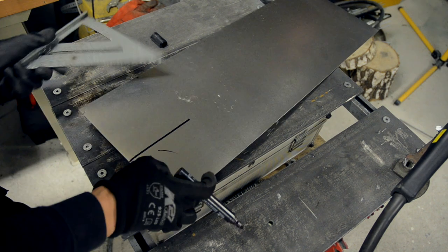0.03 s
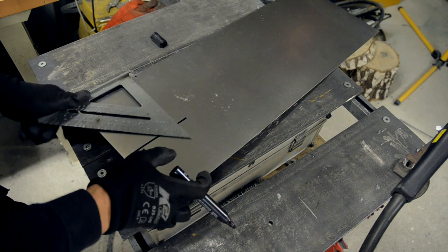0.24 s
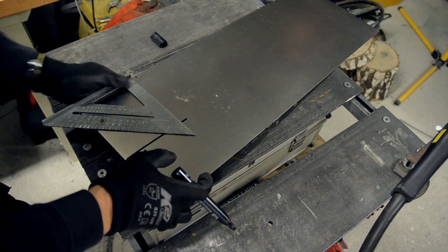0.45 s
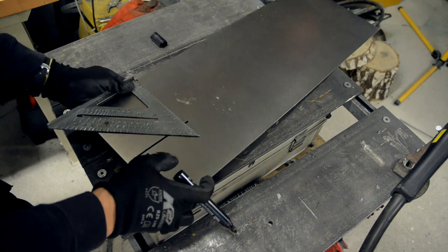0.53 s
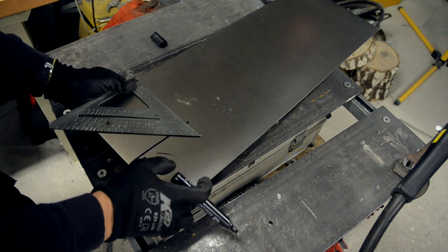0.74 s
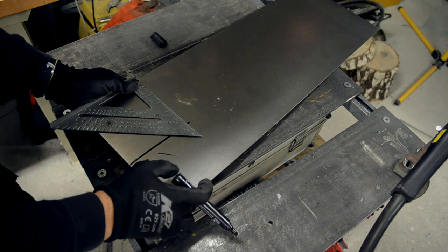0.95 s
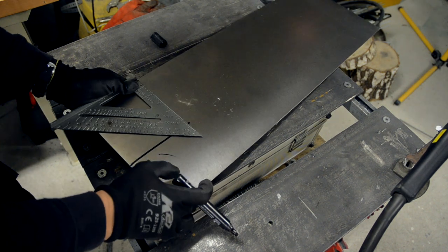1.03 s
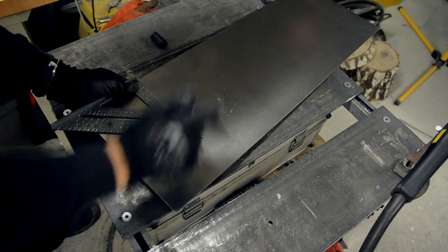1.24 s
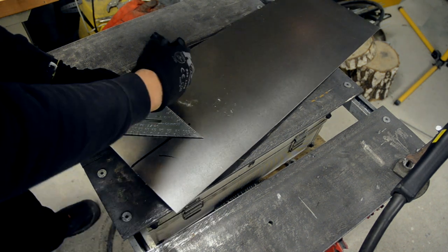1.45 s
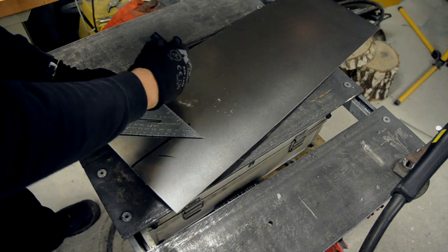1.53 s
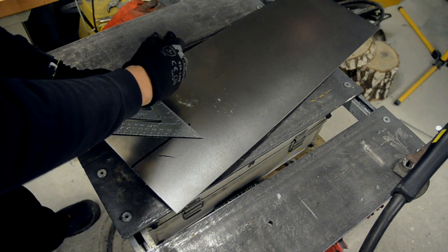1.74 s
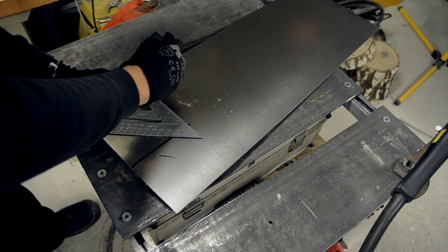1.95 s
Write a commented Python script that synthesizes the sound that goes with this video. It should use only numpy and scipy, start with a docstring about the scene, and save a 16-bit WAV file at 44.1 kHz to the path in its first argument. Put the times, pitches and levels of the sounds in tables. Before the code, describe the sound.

Two close metallic clanks sound in a quiet, humming workshop as a square hits a steel sheet edge first, then drops flat. The ringing dies away quickly, leaving small taps and soft sliding scuffs.

```python
"""Two ringing clanks: a metal square is set down on a steel sheet in a workshop.
Its edge lands with a crack and chatters while the sheet rings; it then drops flat with a slap
and rings until a glove damps it. Faint taps and scuffs surround the clanks and go on as it is
lined up, over the low hum of the room."""
import sys
import numpy as np
from scipy import signal
from scipy.fft import irfft
from scipy.io import wavfile
from scipy.ndimage import uniform_filter1d

SR = 44100
rng = np.random.default_rng(int(sys.argv[2]) if len(sys.argv) > 2 else 0)


def log_audio(samples):
    """Write samples as a 16-bit WAV file to the path given in sys.argv[1]."""
    # one column per channel
    frames = np.atleast_2d(samples).T
    # limit to full scale, then quantise
    limited = np.clip(frames, -1, 1)
    pcm = np.round(limited * 32767).astype(np.int16)
    wavfile.write(sys.argv[1], SR, pcm)


N = 88200
T = np.arange(N) / SR
HZ = np.fft.rfftfreq(N, 1 / SR)
EDGE_S, PRESS_S, FLAT_S, DAMP_S = .2171, .33, .5305, .665

# room decay: freq_hz, t60_s
ROOM_DECAY = [(150, .5), (800, 0.41), (2500, 0.31), (6000, .28), (14000, 0.094)]
# sheet modes under the square's weight: pitch_hz, level_db, t60_s
LOADED_SHEET_MODES = [(366, -7, .6), (381, -5, .45), (829, 0, .62), (1066, -7, .4), (1330, -9, .42)]


def amp(db):
    return 10 ** (np.asarray(db) / 20)


def unit_rms(x):
    return x / np.sqrt(np.mean(x ** 2) + 1e-20)


def curve(points, hz=HZ):
    """Table interpolated over log frequency."""
    freq_hz, value = np.transpose(points)
    return np.interp(np.log(hz + 1), np.log(freq_hz + 1), value)


def add(mix, start_s, sound):
    part = mix[max(round(start_s * SR), 0):]
    part += sound[:len(part)]


def rise(tau_s):
    return 1 - np.exp(-T / max(tau_s, 1e-5))


def fall(t, t60_s):
    return np.exp(-np.log(1000) * t / np.maximum(t60_s, 1e-3))


def noise(spectrum_db):
    """Random-phase noise, rms 1."""
    return unit_rms(irfft(amp(spectrum_db) * np.exp(2j * np.pi * rng.random(len(HZ))), N))


def click(spectrum_db, energy_s):
    """Minimum-phase pulse with the energy of energy_s of unit noise."""
    log_gain = np.log(amp(np.maximum(spectrum_db - spectrum_db.max(), -90)))
    mirrored = np.r_[log_gain, log_gain[-2:0:-1]]
    pulse = np.fft.ifft(np.exp(np.conj(signal.hilbert(mirrored)))).real
    return pulse / np.linalg.norm(pulse) * np.sqrt(energy_s * SR)


def ring(modes, hold_s=0):
    """Partials that hold, then decay."""
    t = np.maximum(T - hold_s, 0)
    return sum(amp(db) * fall(t, t60_s) * np.sin(2 * np.pi * (hz * T + rng.random()))
               for hz, db, t60_s in modes)


def tail(spectrum_db, decays, holds=None):
    """Dense modes and echoes: each band holds, then decays at its own rate."""
    hz, t, bands = signal.stft(noise(spectrum_db), SR, nperseg=256)
    hold_s = curve(holds, hz)[:, None] if holds else 0
    envelope = fall(np.maximum(t - hold_s, 0), curve(decays, hz)[:, None])
    return signal.istft(bands * envelope, SR, nperseg=256)[1][:N]


def grain(depth_db, samples):
    """Quick level swings from uneven contact."""
    swing = unit_rms(uniform_filter1d(rng.standard_normal(N), samples))
    return unit_rms(amp(depth_db * swing))


def contact_spectrum_db(centre_hz, width_oct, skirt_db=7.5):
    """Rounded peak within the range where light contacts move the sheet."""
    bass_hz, treble_hz = 220, 11000
    rolloff = 1 + (bass_hz / (HZ + 1)) ** 4 + (HZ / treble_hz) ** 4
    offset = np.log2((HZ + 1) / centre_hz) * 2 / width_oct
    return -skirt_db * np.hypot(1, offset) - 10 * np.log10(rolloff)


def workshop():
    """Steady room noise with a wavering hum."""
    # noise spectrum: freq_hz, density_db
    floor_spectrum = [(20, -28.5), (35, -17.5), (50, -11), (65, -16.5), (100, -13), (145, -5.5),
                      (190, -7.5), (300, -8), (480, -10), (720, -10), (1000, -14.5), (1500, -20.5),
                      (2500, -28.5), (4000, -33.5), (8000, -44), (12000, -44), (16000, -44.5)]
    # hum tones: pitch_hz, level_db, waver_ratio
    hum_tones = [(47.4, -72.5, 0.12), (146, -64.5, 0.51)]
    room = amp(-59) * noise(curve(floor_spectrum))
    for hz, db, waver in hum_tones:
        drift = noise(-20 * np.log10(1 + (HZ / 3) ** 4))  # below 3 Hz
        tone = np.sin(2 * np.pi * (hz * T + rng.random()))
        room += amp(db) * unit_rms((1 + waver * drift) * tone)
    return room


def scuff(peak_s, half_length_s, level_db, centre_hz, width_oct):
    """Square or glove slides on the steel: a grainy swell and fade."""
    friction = noise(contact_spectrum_db(centre_hz, width_oct)) * grain(depth_db=1.5, samples=80)
    swell = np.exp(1 - np.hypot(1, (T - peak_s) * np.sqrt(2) / half_length_s))
    return amp(level_db) * friction * swell


def tap(level_db, centre_hz, width_oct, tail_db):
    """Light contact: a tick, its scatter from the bench, the room's echo."""
    spectrum_db = contact_spectrum_db(centre_hz, width_oct)
    tick = click(spectrum_db, energy_s=.0009)
    scatter = amp(-.5) * noise(spectrum_db) * fall(T, .025) * rise(.001) ** 2
    room = amp(tail_db) * tail(spectrum_db, ROOM_DECAY) * rise(.002) ** 2
    return amp(level_db) * (tick + scatter + room)


def loaded_sheet():
    """Low ring as the square starts to bear on the sheet."""
    return amp(-35) * ring(LOADED_SHEET_MODES) * rise(.026)


def flat_clank():
    """The square slaps down flat and rings until the glove damps it; the sheet rings on."""
    # slap spectrum: freq_hz, density_db
    slap_spectrum = [(60, -50.5), (130, -23), (300, -15), (480, -12), (680, -11.5), (920, -8), (1150, -0.5),
                     (1420, -7), (2040, -3), (2450, -10.5), (3780, -6), (4250, -22), (4750, -16),
                     (6300, -24.5), (8000, -38), (12000, -40.5), (16000, -56)]
    # square lying flat: pitch_hz, level_db, t60_s
    flat_modes = [(680, -2, .1), (1150, 1, .1), (1680, -7, .17), (2020, -1, .08), (2180, -8, .22),
                  (2660, -5, .07), (2740, -11, .18), (2842, -10, .36), (2856, -14, .25), (3295, -1, .095),
                  (3560, -6, .07), (3680, -5, .06), (3790, 0, .085), (4080, -4, .05), (4570, -13, .1),
                  (4830, -14, .11), (4960, -24, .22)]
    spectrum_db = curve(slap_spectrum)
    slap = amp(-28) * noise(spectrum_db) * fall(T, .089)
    room = amp(-35) * tail(spectrum_db, ROOM_DECAY) * rise(.0023)
    glove_damping = fall(np.maximum(T + FLAT_S - DAMP_S, 0), t60_s=.14)
    square = amp(-30.5) * ring(flat_modes) * glove_damping
    sheet = amp(-43) * ring(LOADED_SHEET_MODES)
    return (slap + room + square + sheet) * rise(.00039)


def edge_clank():
    """The edge lands: a hard crack, then chatter that keeps the sheet ringing."""
    # impact spectrum: freq_hz, density_db
    crack_spectrum = [(30, -22), (120, -12.5), (300, 0.5), (550, 0.5), (900, 2), (1500, 0), (2200, -7),
                      (3300, -7), (5000, -18), (7500, -16.5), (10500, -11), (13000, -19.5), (16000, -31)]
    # modes of the square on edge and of the sheet: pitch_hz, level_db, t60_s
    edge_modes = [(917, -1, 0.073), (1452, -0.5, .05), (1958, -9, .03), (3124, -1, 0.03),
                  (3860, -6.5, 0.061), (5402, -7.5, 0.02), (5900, -4, 0.028), (7520, -8, 0.033),
                  (7757, -5.5, 0.02), (9625, -11, .022), (10450, -5.5, .025), (12100, -10, .02)]
    sheet_modes = [(363, -13, .8), (392, -14, .6), (500, -11, .55), (647, -5, .6), (804, 0, .42),
                   (879, -4, .5), (920, -7, .5), (947, -7, .4), (969, -7, .45), (1042, -8, .55),
                   (1217, -11, .55), (1330, -2, .45), (1373, -7, .42), (1428, -7, .42), (1605, -6, .4),
                   (1684, -8, .45), (1829, -8, .42), (1976, -4, .45), (2009, -7, .48), (2207, -11, .45),
                   (2256, -11, .4), (2842, -11, .42), (3215, -8, .3), (3817, -11, .36), (4356, -12, .38),
                   (6213, -14, .2)]
    # chatter by band
    chatter_spectrum = [(40, -51.5), (100, -37), (200, -23.5), (380, -15), (560, -14), (850, -6.5),
                        (1170, -13), (1400, -6.5), (1950, -6), (2470, -17), (3200, -13), (4300, -15.5),
                        (5500, -16.5), (6900, -25.5), (7500, -24), (8300, -32), (10300, -31), (12200, -37),
                        (14000, -44.5), (16000, -61.5)]  # freq_hz, density_db
    chatter_hold = [(150, 0.26), (700, 0.13), (1500, 0.047), (3500, 0.078), (7000, 0.073), (14000, 0.051)]  # freq_hz, hold_s
    chatter_decay = [(150, 0.38), (700, 0.62), (1500, 0.59), (3500, 0.39), (7000, 0.33), (14000, 0.2)]  # freq_hz, t60_s
    spectrum_db = curve(crack_spectrum)
    blow = amp(-20.5) * click(spectrum_db, energy_s=.0019)
    crack = amp(-17) * noise(spectrum_db) * fall(T, .028) * rise(.00051)
    square = amp(-18.5) * ring(edge_modes) * rise(.0003)
    chatter = amp(-25) * tail(curve(chatter_spectrum), chatter_decay, chatter_hold)
    chatter *= grain(depth_db=1, samples=140) * rise(.0045)
    sheet = amp(-32) * ring(sheet_modes, hold_s=.082) * rise(.018)
    return blow + crack + square + chatter + sheet


def scene():
    """Room, two clanks and small contacts; mono."""
    # light contacts: start_s, level_db, centre_hz, width_oct, tail_db
    taps = [(.001, -36, 806, 1.09, -4), (0.242, -30, 2000, 1.75, -0.5), (0.267, -26, 1700, 1.5, -16),
            (0.329, -18.5, 970, 0.35, -15), (.354, -25, 810, 0.74, -13), (.365, -35, 2000, 1.47, -19),
            (.604, -56.5, 3500, 1.5, -5), (.612, -45, 400, 0.61, -10), (.7295, -36, 730, 0.87, -11.5),
            (0.7496, -55, 5540, 1.5, -9), (1.0089, -51.5, 1500, 1.54, -18.5),
            (1.0435, -48.5, 750, 0.91, -15)]
    # slides: peak_s, half_length_s, level_db, centre_hz, width_oct
    scuffs = [(0.136, 0.033, -60, 2200, 1.14), (0.46, .016, -42, 910, 1.22),
              (0.487, 0.035, -44.5, 1233, 1.12), (0.626, 0.023, -51.5, 800, 0.97),
              (0.677, 0.011, -58, 1700, 1.56), (0.763, .016, -53, 1400, 1),
              (1.041, 0.012, -64.5, 2210, 2.2), (1.204, 0.015, -59.5, 1160, 1.4),
              (1.293, 0.021, -67, 1180, 1.73), (1.667, .025, -71.5, 1805, 1.07),
              (1.799, .014, -58, 512, 0.44)]
    mix = workshop()
    add(mix, EDGE_S, edge_clank())
    add(mix, PRESS_S, loaded_sheet())
    add(mix, FLAT_S, flat_clank())
    for start_s, *contact in taps:
        add(mix, start_s, tap(*contact))
    for slide in scuffs:
        mix += scuff(*slide)
    return mix[None]


def record(dry):
    """Steep low-pass."""
    cutoff_hz = 15900
    lowpass = signal.firwin(301, cutoff_hz, window=("kaiser", 9), fs=SR)
    return signal.oaconvolve(dry, lowpass[None], "same")


dry = scene()
out = record(dry)
log_audio(out)
```